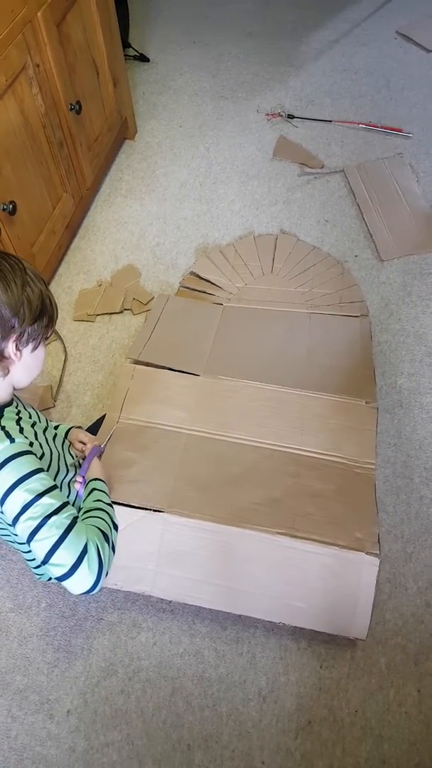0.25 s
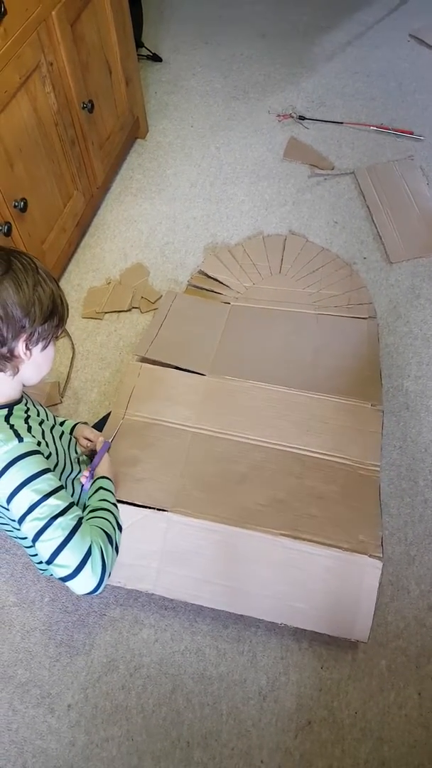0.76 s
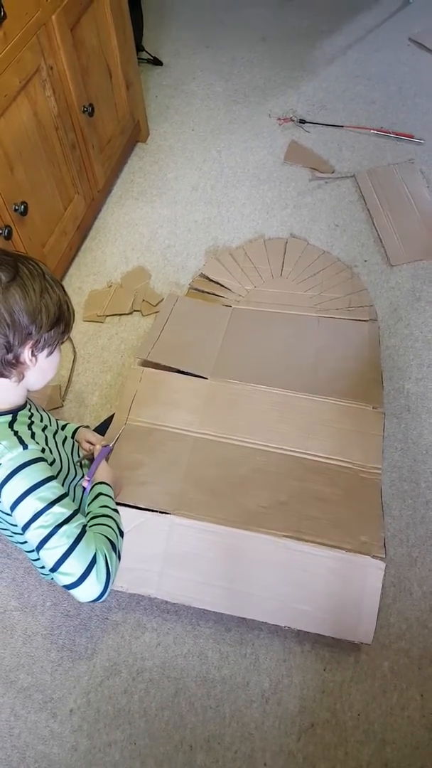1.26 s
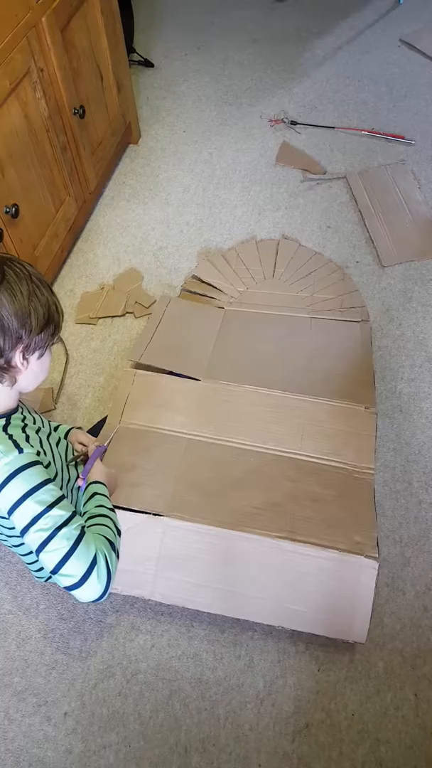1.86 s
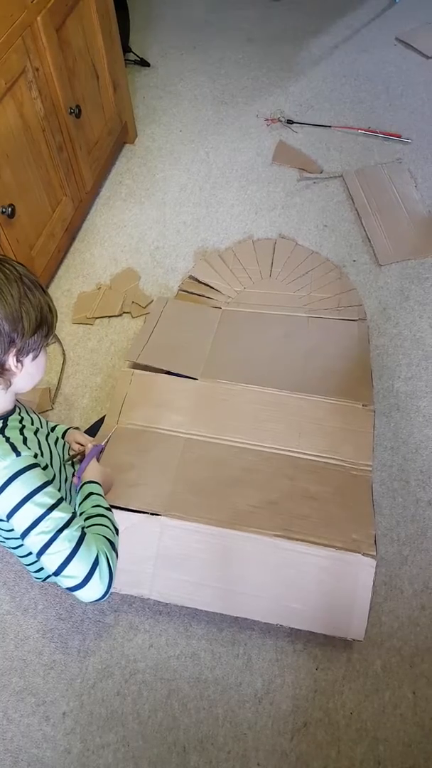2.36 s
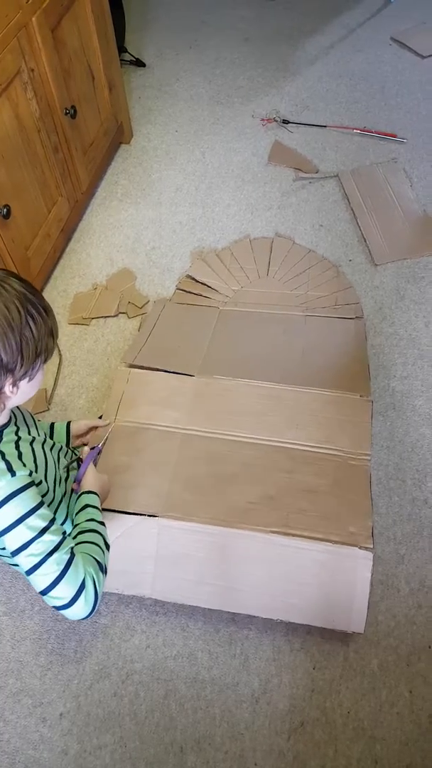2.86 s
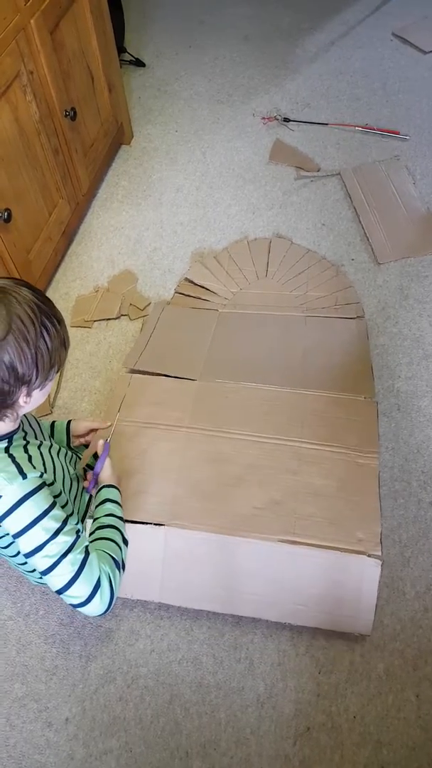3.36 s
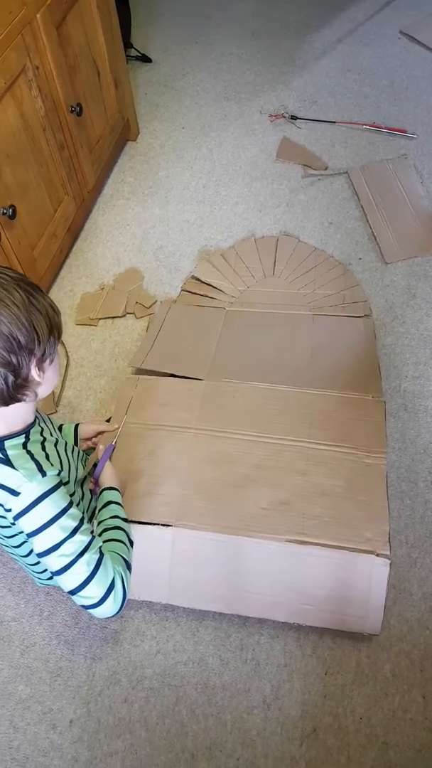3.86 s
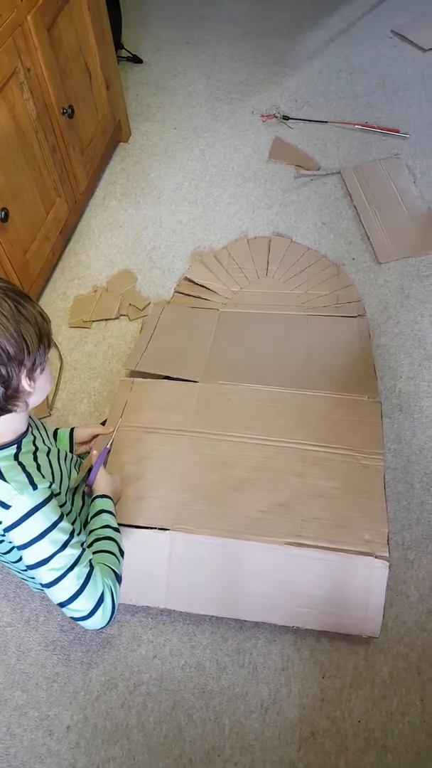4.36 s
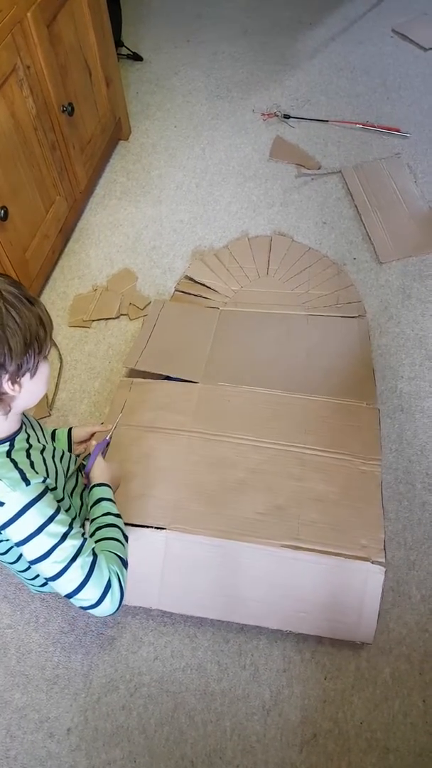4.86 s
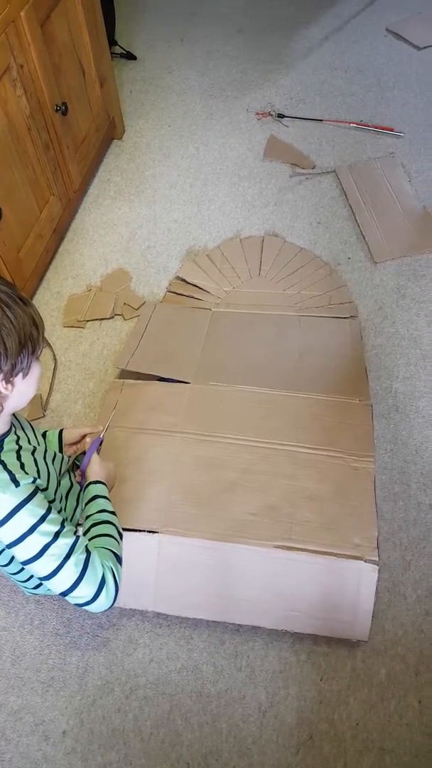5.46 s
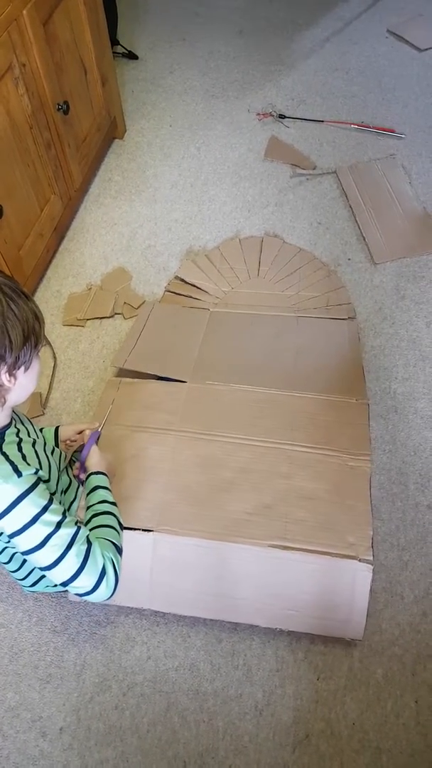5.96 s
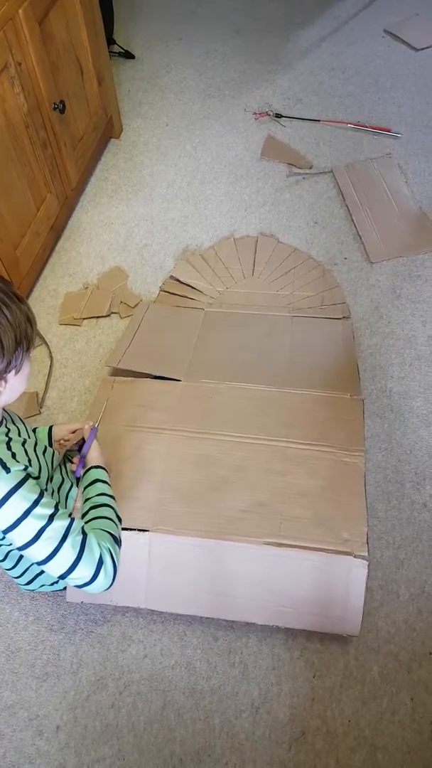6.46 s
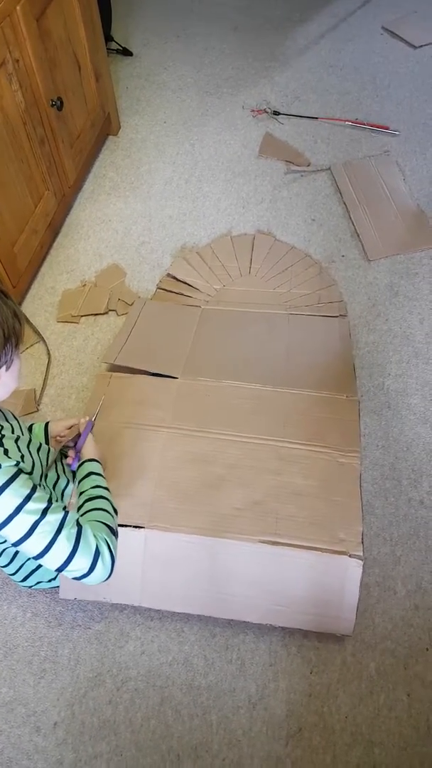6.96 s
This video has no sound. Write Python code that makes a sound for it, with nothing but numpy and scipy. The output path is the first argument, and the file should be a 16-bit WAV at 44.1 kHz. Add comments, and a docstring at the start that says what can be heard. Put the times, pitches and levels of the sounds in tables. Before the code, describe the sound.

Scissors snip through a sheet of corrugated cardboard in short, crunchy cuts with hollow knocks, over a faint room hum.

```python
"""Scissors cut a big sheet of corrugated cardboard on a carpet, in short strokes.
Each flute fails under the blades: its fibres crackle, and the impulse excites a hollow knock
and the bending modes of the sheet. Between cuts, friction makes the blades scrape along the slot;
once they bind and squeak, and now and then their edges click together.
A small room reverberates, over a steady mains hum, soft air noise and a thin whine."""
import sys
import numpy as np
from scipy import signal
from scipy.fft import rfft, irfft, next_fast_len
from scipy.io import wavfile
from scipy.ndimage import uniform_filter1d

SR = 44100
rng = np.random.default_rng(int(sys.argv[2]) if len(sys.argv) > 2 else 0)


def generate_wav(sig):
    """Save sig (samples, or channels by samples) to the path in sys.argv[1] as 16-bit PCM at SR."""
    pcm = np.round(np.clip(np.atleast_2d(sig).T, -1, 1) * 32767).astype(np.int16)
    wavfile.write(sys.argv[1], SR, pcm)


N = 318402
TIME = np.arange(N) / SR
AGE = np.arange(SR // 3) / SR  # seconds into one short sound

# Flutes giving way. Each row: time in seconds, then relative levels of crack, knock and boom in dB.
COLLAPSES = [(.179, -54.5, -64, -66), (0.3559, -45.5, -42.5, -48), (0.3771, -47, -65, -57),
             (0.5576, -45.5, -48, -46.5), (.69, -74, -57, -50.5), (0.7922, -60, -50.5, -48),
             (1.1298, -57, -49, -42), (1.1648, -42, -37, -31), (1.215, -52, -47, -35.5),
             (1.7353, -46.5, -40, -32), (1.79, -42.5, -31, -31.5), (2.296, -90, -61, -57.5),
             (2.4107, -42, -32, -24.5), (3.7825, -46, -42.5, -36), (3.831, -48, -45, -42.5),
             (3.981, -42.5, -41, -36.5), (4.029, -49.5, -45.5, -39), (4.1055, -46.5, -42, -39),
             (4.73, -44.5, -47, -33.5), (4.7435, -56, -52, -40.5), (4.757, -55, -47, -43),
             (4.8731, -42, -38.5, -36.5), (5.3517, -53, -53.5, -49), (5.3833, -48, -47, -42.5),
             (5.4, -52, -46, -46), (5.976, -57.5, -53.5, -51), (6.0116, -47.5, -44, -48.5),
             (6.126, -46.5, -37.5, -40), (6.666, -42.5, -41, -37), (6.7019, -47.5, -40, -37.5)]
# Spectrum of a scraping blade. Each row: frequency in Hz, relative spectral density in dB.
SCRAPE_SPECTRUM = [(300, 12.5), (1100, 5.5), (2000, 6), (3300, 2.5), (5200, 4), (7000, -1), (8700, 1),
                   (11000, -3), (14000, -2), (16000, -14)]
# Spectrum of crushed paper. Each row: frequency in Hz, relative spectral density in dB.
CRUNCH_SPECTRUM = [(40, -35), (150, -27), (400, 4), (650, 3), (830, -2.5), (1080, 3.5), (1500, -9.5),
                   (1900, -15.5), (2500, -19.5), (4000, -40)]


def amp(db):
    """Amplitude ratio of a level in decibels."""
    return 10 ** (np.asarray(db) / 20)


def unit(x):
    """Normalisation to an rms of 1."""
    return x / np.sqrt(np.mean(x ** 2) + 1e-20)


def unit_hit(x):
    """Normalisation of a transient to the energy of 10 ms at rms 1."""
    return unit(x) * np.sqrt(SR / 100 / x.shape[-1])


def along(points, hz):
    """Interpolation of (Hz, value) points on a logarithmic frequency axis."""
    freqs, values = np.transpose(points)
    return np.interp(np.log(hz + 1), np.log(freqs), values)


def filtered(x, response):
    """Linear filtering: the spectrum of x is multiplied by a frequency response."""
    n = x.shape[-1]
    size = next_fast_len(n + SR // 5)
    return irfft(rfft(x, size) * response(np.fft.rfftfreq(size, 1 / SR)), size)[..., :n]


def coloured(x, spectrum):
    """Spectral shaping by a curve of (Hz, dB) points."""
    return filtered(x, lambda hz: amp(along(spectrum, hz)))


def add(track, s, sound):
    """Superposition of a sound on the track, from s seconds on."""
    part = track[:, max(round(s * SR), 0):][:, :sound.shape[-1]]
    part += sound[..., :part.shape[-1]]


def diffuse(pair):
    """A diffuse field is coherent at two nearby points only at long wavelengths."""
    # Each row: frequency in Hz, correlation of left and right.
    coherence = [(100, 0.93), (290, 0.93), (640, 0.39), (1400, 0), (3000, 0)]
    turn = lambda hz: np.arccos(np.clip(along(coherence, hz), -1, 1)) / 2
    mid, side = filtered(pair, lambda hz: np.array([np.cos(turn(hz)), np.sin(turn(hz))]))
    return np.array([mid + side, mid - side])


def in_room(x, wet_db, build_s=0.0036):
    """Reverberation: reflections build up behind the direct sound and decay exponentially."""
    # Each row: frequency in Hz, time to decay by 60 dB in seconds.
    decay_times = [(150, 0.47), (300, 0.11), (600, 0.24), (1200, 0.29), (5000, 0.29), (9000, 0.23),
                   (15000, 0.24)]
    hz, t, bands = signal.stft(diffuse(rng.standard_normal((2, SR // 2))), SR, nperseg=256)
    tail = signal.istft(bands * amp(-60 * t / along(decay_times, hz)[:, None]), SR, nperseg=256)[1]
    tail *= 1 - np.exp(-(np.arange(tail.shape[1]) / SR / build_s) ** 2)
    x = x * np.ones((2, 1))
    reverb = signal.fftconvolve(x, tail, axes=1)[:, :x.shape[1]]
    return x + amp(wet_db) * np.std(x) * unit(reverb)


def room_tone(air_db=-60.5, whine_hz=14200, whine_width_hz=150, whine_db=-81):
    """The noise floor is a sum of tonal mains hum, broadband air noise and a narrowband whine."""
    # Each row: frequency in Hz, rms level in dB.
    hum_tones = [(100.2, -56), (66, -73)]
    # Each row: frequency in Hz, relative spectral density in dB.
    air_spectrum = [(20, 0), (45, -13), (68, 6.5), (82, 1), (140, 2.5), (210, -1), (295, 1), (420, -4.5),
                    (750, -10.5), (1100, -10), (1700, -14.5), (4000, -22), (9000, -29.5), (16000, -24.5)]
    hum = sum(amp(db) * np.sqrt(2) * np.sin(2 * np.pi * (hz * TIME + rng.random()))
              for hz, db in hum_tones)
    air = unit(coloured(diffuse(rng.standard_normal((2, N))), air_spectrum))
    whine_band = lambda hz: np.exp(-((hz - whine_hz) / whine_width_hz) ** 2)
    whine = unit(filtered(rng.standard_normal((2, N)), whine_band))
    return hum + amp(air_db) * air + amp(whine_db) * whine


def grains(n, spread_db, size=12):
    """Tiny fibre breaks form a stereo noise whose strength changes every `size` samples."""
    strength = np.repeat(amp(spread_db * rng.standard_normal(n // size + 1)), size)[:n]
    return unit(strength * rng.standard_normal((2, n)))


def tear(tearing_s, lead_s, give_s=0.0025, crush_db=-16, crush_s=0.0019):
    """Fracture comes in clumps: a few fibres break as the blade presses, most when the flute gives."""
    t = AGE - lead_s
    after = np.maximum(t, 0)
    burst = (1 - np.exp(-after / give_s)) * np.exp(-3 * after / tearing_s)
    envelope = burst / burst.max() + amp(crush_db) * np.exp(-abs(t) / crush_s)
    clumps = abs(np.interp(AGE, np.arange(300) / 900, 1 + .4 * rng.standard_normal(300)))
    return envelope * clumps * grains(len(AGE), spread_db=2)


def harder(spectrum, force_db, edge_hz=1350):
    """A harder break is more abrupt, so its treble grows faster than the rest."""
    return [(hz, db + force_db / (1 + (edge_hz / hz) ** 6)) for hz, db in spectrum]


def ring(modes, tuning, scatter_db, attack_s):
    """Free vibration is a sum of damped modes, whose strengths and pitches vary from cut to cut."""
    frequency, db, t60 = np.transpose(modes)[:, :, None]
    level, detune, phase = rng.standard_normal((3, len(modes), 1))
    swing = np.sin(2 * np.pi * tuning * frequency * (1 + 0.028 * detune) * AGE + 1.07 * phase)
    decay = amp(db + scatter_db * level - 60 * AGE / t60)
    onset = 1 - np.exp(-(AGE / attack_s) ** 2)
    return unit_hit((decay * swing).sum(0) * onset)


def returning_wave(hz, delay_s=0.042, spread_s=0.03, width_hz=115, droop_per_s=0.65):
    """Dispersion: a bending wave returns from the far edge, its slower low frequencies last."""
    blur = filtered(rng.standard_normal((2, len(AGE))), lambda f: np.exp(-(f / width_hz) ** 2))
    phase = 2 * np.pi * hz * (AGE - droop_per_s * (AGE - delay_s) ** 2 / 2)
    wave = blur[0] * np.cos(phase) + blur[1] * np.sin(phase)
    envelope = np.exp(-((AGE - delay_s) / spread_s) ** 2) * (1 - np.exp(-AGE / 0.0061))
    return unit_hit(wave * envelope)


def snaps(lead_s=0.03):
    """Impulse excitation: a flute collapses, fibres tear, the liner knocks and the freed sheet booms."""
    # Squeezes of the handles. Each row: start in seconds, tearing time in seconds, sheet pitch in Hz,
    # relative level of the returning wave in dB, its pitch in Hz.
    squeezes = [(.1, 0.014, 302, -8, 603), (1.1, 0.015, 299, -7, 491.6), (1.7, .012, 304.7, -14.5, 577),
                (2.25, .013, 280.4, -12, 625.3), (3.7, 0.0087, 291, -20, 565), (3.9, 0.018, 253, -6.5, 537),
                (4.09, 0.016, 299, -3.5, 590), (4.7, 0.005, 292, -14, 574), (5.3, 0.018, 295, -9, 569),
                (5.9, 0.012, 293, 0, 535), (6.6, 0.014, 294, 1, 512)]
    # Breaking fibres. Each row: frequency in Hz, relative spectral density in dB.
    fibre_spectrum = [(100, 4.5), (400, 9), (1300, -2.5), (2100, -2), (3100, -4), (5000, -1.5), (7000, -3),
                      (8600, -2.5), (10500, -7.5), (13700, -4.5), (16000, -17)]
    # Stiff flutes and liner near the cut. Each row: nominal frequency in Hz, level in dB, T60 in seconds.
    flute_modes = [(611.4, -3, 0.096), (736, -5, 0.068), (954, -5.5, 0.07), (1037, 5.5, 0.029),
                   (1177, -6.5, 0.031), (1324, -14.5, 0.037), (1486, -12, 0.042)]
    # Bending of the sheet. Each row: multiple of the sheet pitch, level in dB, T60 in seconds.
    sheet_modes = [(.55, -18, 0.11), (.85, -17.5, 0.079), (1, -1.5, .12), (1.16, -14.5, 0.2),
                   (1.42, -15.5, 0.15), (1.68, -11, 0.086)]
    bass_cut = signal.butter(3, 140, "high", fs=SR, output="sos")  # a free sheet radiates no deep bass
    track = np.zeros((2, N))
    for s, crack_db, knock_db, boom_db in COLLAPSES:
        _, tearing_s, sheet_hz, return_db, return_hz = [row for row in squeezes if row[0] <= s][-1]
        crack = unit_hit(coloured(tear(tearing_s, lead_s), fibre_spectrum))
        crunch_spectrum = harder(CRUNCH_SPECTRUM, force_db=max(knock_db + 42.5, -8))
        crunch = unit_hit(coloured(tear(tearing_s, lead_s)[0], crunch_spectrum))
        knock = ring(flute_modes, tuning=0.99, scatter_db=3.5, attack_s=0.00067)
        bending = ring(sheet_modes, tuning=sheet_hz, scatter_db=2, attack_s=0.0018)
        boom = signal.sosfilt(bass_cut, bending)
        add(track, s - lead_s - .001, amp(crack_db - 0.5) * in_room(crack, wet_db=1))
        add(track, s - lead_s, amp(knock_db - 11) * in_room(crunch, wet_db=1.5))
        add(track, s, amp(knock_db - 3) * in_room(knock, wet_db=-3))
        add(track, s, amp(boom_db) * in_room(boom, wet_db=-5, build_s=0.0045))
        add(track, s, amp(boom_db + return_db - 4.5) * in_room(returning_wave(return_hz), wet_db=1.5))
    return track


def slides(fall_over_rise=1.17, lurch_delay_s=0.018, lurch_rise_s=0.019, crackle_db=-3, snags_per_s=220):
    """Sliding friction: the blades hiss along the cut edge, snag fibres and set the sheet rustling."""
    # Blades reopening or pushed along the slot. Each row: time of the peak in seconds,
    # rise time in seconds, then relative levels of scrape and rustle in dB.
    strokes = [(.43, 0.2, -64.5, -78), (.785, 0.039, -63.5, -51), (1.025, 0.028, -65, -55.5),
               (1.49, 0.039, -60.5, -55), (2.04, 0.022, -73, -61.5), (2.64, 0.088, -67.5, -74),
               (3.285, .033, -67, -61), (3.74, 0.074, -69.5, -73), (4.06, 0.066, -60, -52),
               (4.47, 0.075, -63.5, -55), (5.095, 0.056, -59.5, -56), (5.715, .085, -67.5, -59.5),
               (6.355, 0.062, -59.5, -53.5), (6.98, .048, -62, -56), (7.17, 0.13, -73, -63)]
    # After each collapse the blade lurches on.
    lurches = [(s + lurch_delay_s, lurch_rise_s, crack_db - 24.5, boom_db - 21)
               for s, crack_db, _, boom_db in COLLAPSES]
    peak, rise, scrape_db, rustle_db = np.transpose(list(strokes) + lurches)[:, :, None]
    t = TIME[::SR // 1000]
    speed = np.exp(-((t - peak) / np.where(t < peak, rise, fall_over_rise * rise)) ** 2)
    envelope = lambda db: np.interp(TIME, t, (amp(db) * speed).sum(0))
    scrape = envelope(scrape_db) * unit(coloured(grains(N, spread_db=3, size=30), SCRAPE_SPECTRUM))
    # Each row: frequency in Hz, relative spectral density in dB.
    rustle_spectrum = [(30, -43), (80, -9), (170, -1), (300, 7.5), (420, -1), (620, -9.5), (820, -5),
                       (1080, -7.5), (1500, -46), (3000, -52)]
    drag = unit(coloured(diffuse(rng.standard_normal((2, N))), rustle_spectrum))
    snags = (rng.random(N) < snags_per_s / SR) * rng.standard_normal(N)
    crackle = amp(crackle_db) * unit(coloured(snags, CRUNCH_SPECTRUM))
    rustle = envelope(rustle_db) * (drag + crackle)
    return in_room(amp(1.5) * scrape + amp(-5) * rustle, wet_db=-3)


def jam(start_s=3.002, attack_s=0.007, fade_s=0.105, squeak_hz=5000, wander_hz=330,
        squeak_delay_s=0.0156, squeak_s=0.004):
    """Friction binds the blades: steel squeaks on steel, and a rasp through the paper dies away."""
    push = (1 - np.exp(-AGE / attack_s)) * np.exp(-(AGE / fade_s) ** np.sqrt(2))
    scrape = unit(coloured(grains(len(AGE), spread_db=2.5, size=30), SCRAPE_SPECTRUM))
    crunch = unit(coloured(diffuse(grains(len(AGE), spread_db=0, size=60)), CRUNCH_SPECTRUM))
    rasp = amp(-51) * push * (scrape + crunch)
    pitch = squeak_hz + wander_hz * unit(uniform_filter1d(rng.standard_normal(len(AGE)), size=30))
    pulse = np.exp(-((AGE - squeak_delay_s) / squeak_s) ** 2)
    squeak = amp(-43) * pulse * np.sin(2 * np.pi * np.cumsum(pitch) / SR)
    track = np.zeros((2, N))
    add(track, start_s, in_room(rasp + squeak, wet_db=-1))
    return track


def ticks(contact_s=0.0011):
    """A brief contact has a broad spectrum: steel catches on steel with a tiny click."""
    # Each row: start in seconds, level in dB.
    contacts = [(3.755, -61), (3.967, -59), (5.043, -61.5), (5.275, -63.5), (5.310, -61.5), (6.646, -60)]
    track = np.zeros((2, N))
    touch = AGE * np.exp(-2 * AGE / contact_s)
    for s, db in contacts:
        click = unit_hit(coloured(rng.standard_normal((2, len(AGE))) * touch, SCRAPE_SPECTRUM))
        add(track, s, amp(db) * in_room(click, wet_db=-2))
    return track


def scene():
    """Superposition: the pressures of the cutting and the room tone add."""
    return snaps() + ticks() + slides() + jam() + room_tone()


def record(dry, top_hz=16050):
    """A band-limited stereo response, a little stronger on the right in the bass and middle."""
    # Each row: frequency in Hz, level of right over left in dB.
    balance = [(60, 4.5), (200, 0.5), (500, 2), (1000, 3), (2000, 0), (6000, 0), (13000, -1)]
    sides = np.array([[-.5], [.5]])
    return filtered(dry, lambda hz: amp(along(balance, hz) * sides) * (hz < top_hz))


dry = scene()
out = record(dry)
generate_wav(out)
```